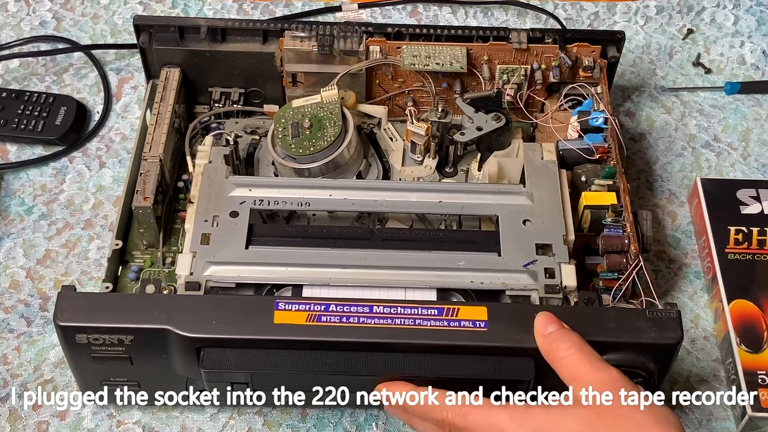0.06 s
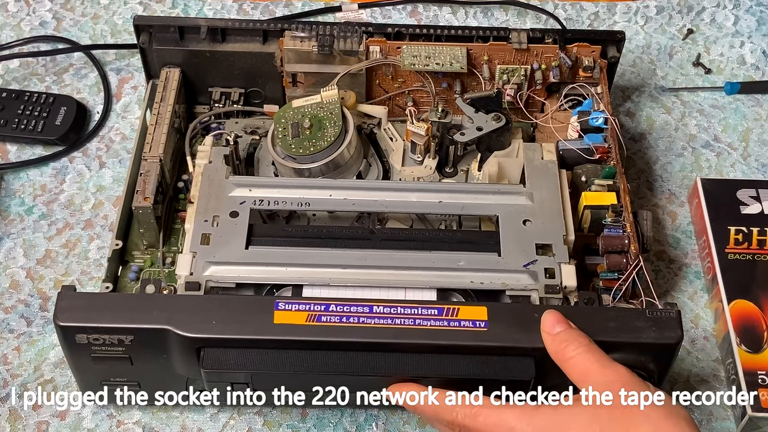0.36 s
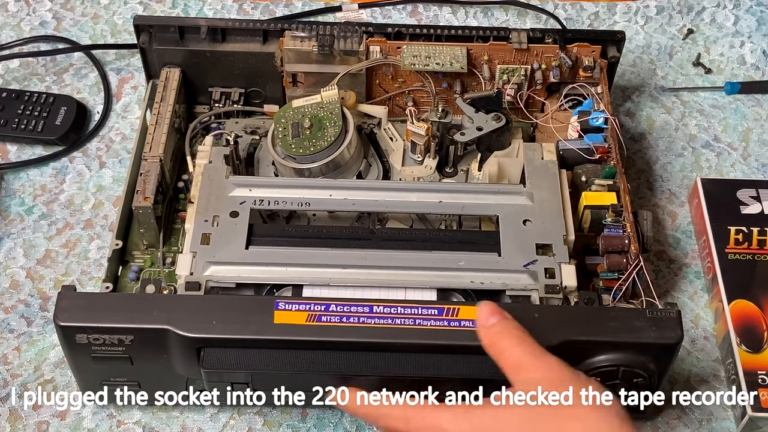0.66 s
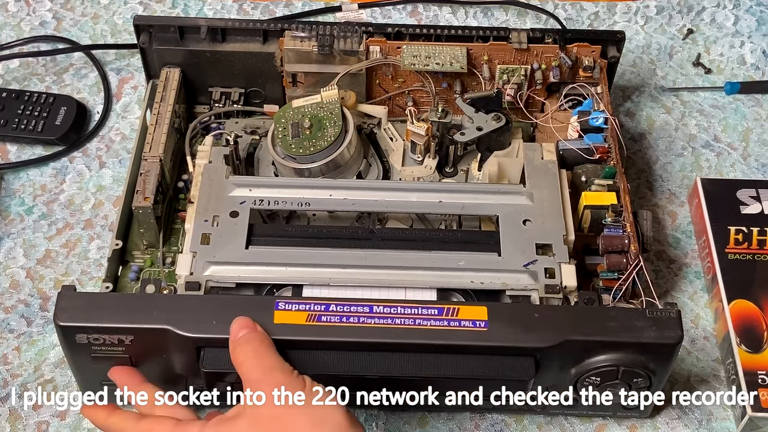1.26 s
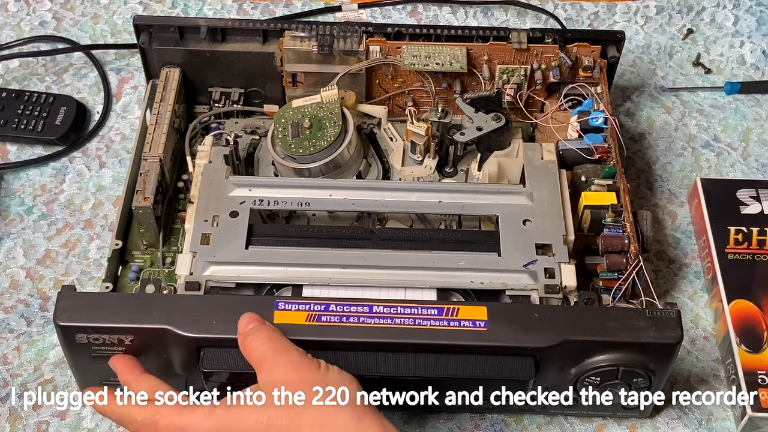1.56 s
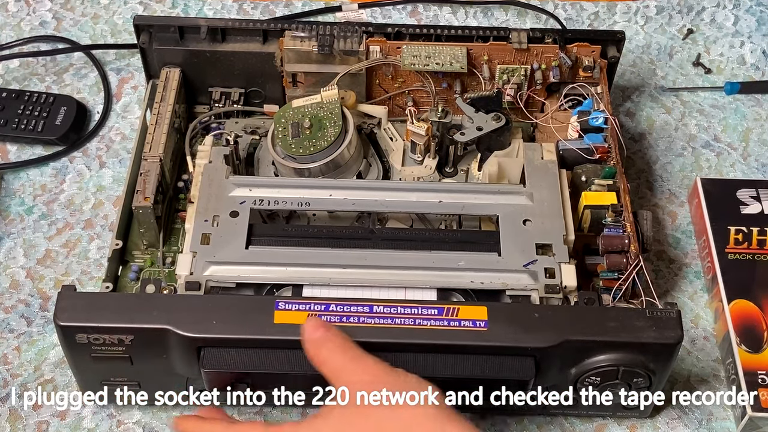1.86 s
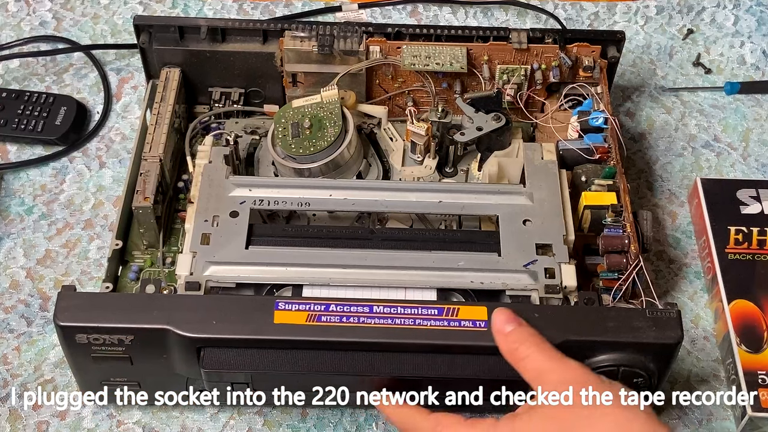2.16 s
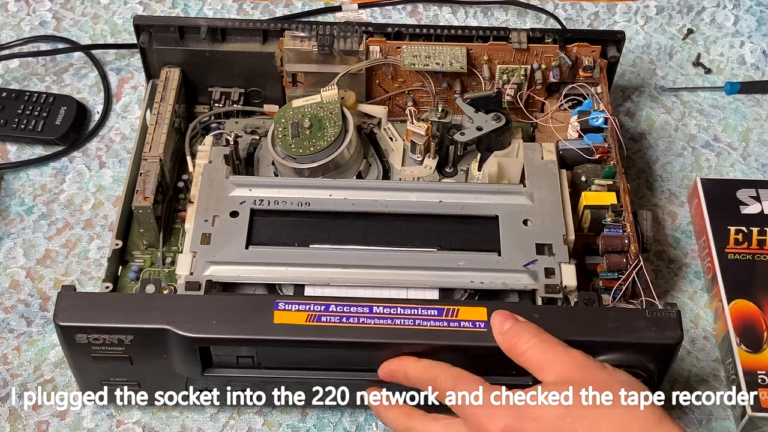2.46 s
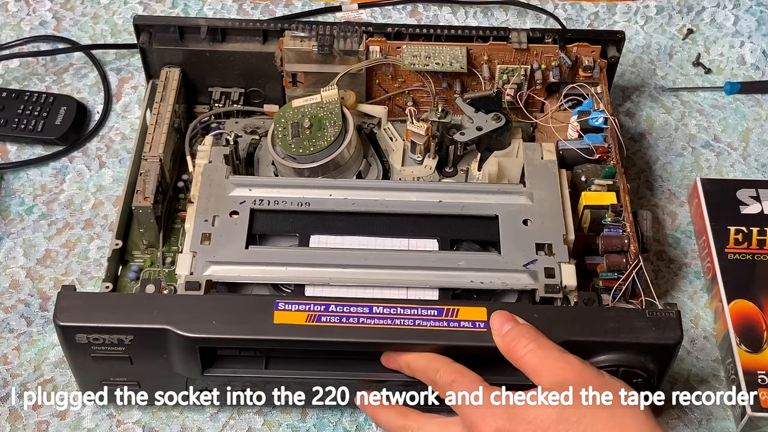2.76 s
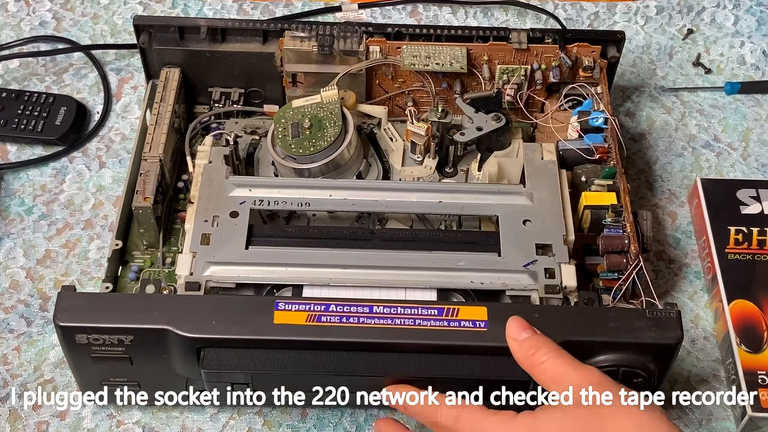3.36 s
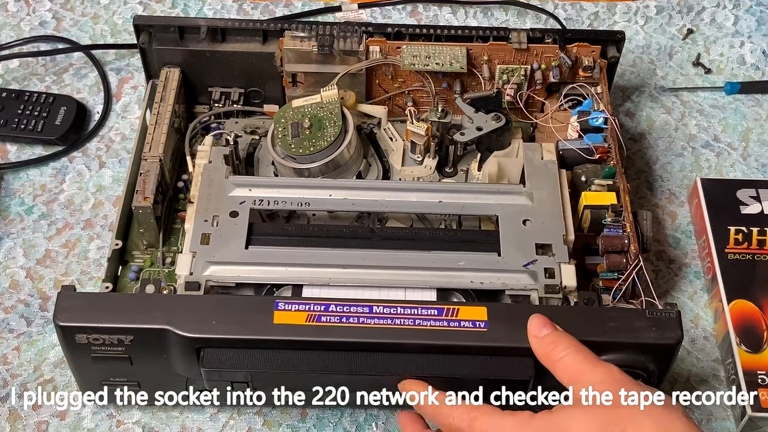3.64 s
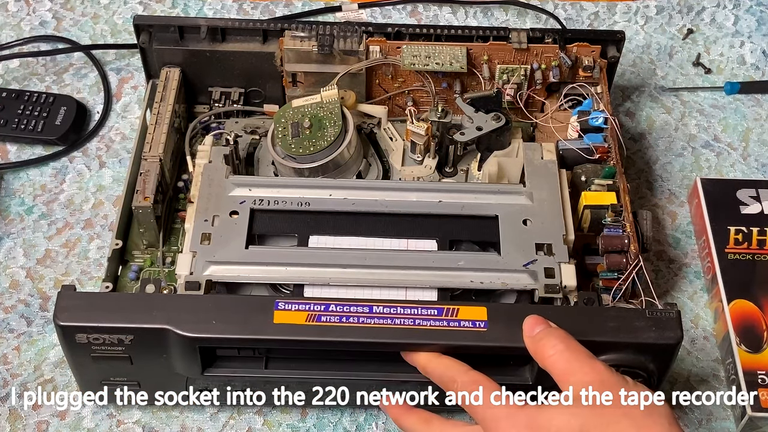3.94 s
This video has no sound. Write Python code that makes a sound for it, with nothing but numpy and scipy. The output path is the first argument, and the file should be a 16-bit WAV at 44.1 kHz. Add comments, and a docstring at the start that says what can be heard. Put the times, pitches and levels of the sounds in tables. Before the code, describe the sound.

Close to a stereo microphone in a small room, a video recorder's cassette flap knocks, followed by faint rubbing and a button click. The flap then clacks and scrapes in, out and in again, with low chassis booms and a faint closing hum.

```python
"""The cassette door of an opened video recorder, on a table in a small room, close to a stereo pair.
The door knocks once; a hand brushes over the plastic front and clicks a button. Then it pushes the
door in, lets it swing back and pushes again: the door scrapes, levers snap, the cabinet knocks and
each jolt sets the chassis booming. A faint hum lingers at the end, over the room's low rumble."""
import sys
import numpy as np
from scipy import signal
from scipy.fft import rfft, irfft
from scipy.io import wavfile

SR = 44100
rng = np.random.default_rng(int(sys.argv[2]) if len(sys.argv) > 2 else 0)


def wrap_up_sound(samples):
    """Save the sound to the file named by the first command line argument, as 16-bit audio."""
    columns = np.atleast_2d(samples).T
    # keep every value between -1 and 1, then stretch to whole-number steps
    tamed = np.clip(columns, -1, 1)
    steps = np.round(tamed * 32767).astype(np.int16)
    wavfile.write(sys.argv[1], SR, steps)


N = 176400


def from_db(db):
    """Decibels to gain."""
    return 10 ** (np.asarray(db) / 20)


def rms_one(x):
    """Scale to rms 1."""
    return x / np.sqrt(np.mean(x ** 2))


def gains(rows):
    """The dB columns of a curve as gains at every sample."""
    times, *columns = np.transpose(rows)
    return [from_db(np.interp(np.arange(N) / SR, times, db)) for db in columns]


def band(x, low, high, order=3):
    """Causal band-pass, edges in Hz."""
    return signal.sosfilt(signal.butter(order, [low, high], "band", fs=SR, output="sos"), x + 1e-18)


def colour(x, spectrum):
    """Give noise a spectrum that falls away beyond its ends; rms 1."""
    hz = np.fft.rfftfreq(N, 1 / SR) + 1
    points_hz, db = np.transpose(spectrum)
    shape = from_db(np.interp(np.log(hz), np.log(points_hz), db))
    skirts = 1 / (1 + (points_hz[0] / hz / 2) ** 4) / (1 + (hz / points_hz[-1] / 2) ** 4)
    return rms_one(irfft(rfft(x) * shape * skirts, N))


def add(out, s, x):
    """Mix x in at time s."""
    i = max(int(s * SR), 0)
    out[i:i + len(x)] += x[:N - i]


def grains(per_s, spread_db):
    """Friction: random tiny slips of uneven size."""
    slips = rng.random(N) < per_s / SR
    sizes = from_db(spread_db * np.minimum(rng.exponential(1, N), 4))
    return slips * sizes * rng.choice([-1, 1], N)


def resonate(x, pitches_hz, widths_hz, boost_db):
    """Resonances lift narrow bands and ring on; a negative boost cuts a dip."""
    return x + sum((from_db(db) - 1) * signal.lfilter(*signal.iirpeak(hz, hz / width, SR), x)
                   for hz, width, db in np.broadcast(pitches_hz, widths_hz, boost_db))


def contacts(rows, crack_s, rattle_s, rattle_db, low_hz, top_hz, body):
    """Each contact is a sharp crack and a short rattle; its highs die sooner than its lows."""
    out, t = np.zeros(N), np.arange(SR // 6) / SR
    edges_hz = [low_hz, 2000, 5000, top_hz]
    attack = 1 - np.exp(-t / .0006)
    for s, *levels in rows:
        for db, low, high in zip(levels, edges_hz, edges_hz[1:]):
            age = t * (low / 2000) ** 0.57  # the decay times hold for the middle band
            decay = np.exp(-age / crack_s) + from_db(rattle_db) * np.exp(-age / rattle_s)
            burst = band(body(rng.choice([-1, 1], len(t)) * decay * attack), low, high)
            strength = np.sqrt(np.sum(burst ** 2) / (.012 * SR))  # rms as if packed into 12 ms
            add(out, s, from_db(db) * burst / strength)
    return out


def struck(rows, modes, rise_s):
    """Blows set modes ringing; all swell in over the given rise time, then die away."""
    out, t = np.zeros(N), np.arange(SR // 2) / SR
    for s, db in rows:
        ring = sum(from_db(level + rng.normal(0, 1) - 60 * t / t60) * np.sin(2 * np.pi * hz * t)
                   for hz, level, t60 in modes)
        add(out, s, from_db(db) * ring * (1 - np.exp(-(t / rise_s) ** 2)))
    return out


# the mechanism's frame (frequency [Hz], width [Hz], boost [dB])
FRAME_RESONANCES = [(553, 120, 21), (1118, 13, 6), (1720, 45, -3.5)]
def frame(x):
    """The frame colours the scrapes and snaps that pass through it."""
    return resonate(x, *np.transpose(FRAME_RESONANCES))


# the door's travel, close up (time [s], rumble level [dB], scrape level [dB])
DOOR_TRAVEL = [(0, -45.5, -49.5), (.08, -50, -64), (.3, -77, -100), (2.29, -73, -105), (2.325, -47.5, -61),
               (2.388, -63, -40), (2.405, -41.5, -37), (2.44, -41.5, -58.5), (2.495, -43, -55.5),
               (2.508, -35.5, -40), (2.56, -34.5, -40.5), (2.58, -43.5, -56), (2.84, -69.5, -91),
               (3.085, -80.5, -105), (3.11, -58.5, -59), (3.25, -44, -50.5), (3.38, -45, -49.5),
               (3.44, -47, -62.5), (3.6, -79.5, -89.5), (3.645, -53.5, -95), (3.72, -57.5, -49.5),
               (3.79, -37.5, -43.5), (3.86, -46, -55.5), (4, -58.5, -108)]
# its two friction spectra (frequency [Hz], level [dB])
RUMBLE_SPECTRUM = [(65, 9), (180, -2), (270, 0.5), (430, -7), (560, -4.5), (750, -15)]
SCRAPE_SPECTRUM = [(500, -1), (1300, -1), (3100, 5.5), (5200, -5.5), (7200, -3), (11000, -11), (15000, -24)]
def door_swing():
    """The cassette door rumbles and scrapes in tiny slips as it swings."""
    rumble_gain, scrape_gain = gains(DOOR_TRAVEL)
    scrape = rms_one(frame(colour(grains(per_s=4000, spread_db=2.5), SCRAPE_SPECTRUM)))
    rumble = colour(grains(per_s=900, spread_db=3.5), RUMBLE_SPECTRUM)
    return band(rumble_gain * rumble + scrape_gain * scrape, 60, 18000)


# the door jolts the chassis (time [s], level [dB])
CHASSIS_JOLTS = [(0, -39.5), (0.101, -32.5), (2.327, -38), (2.509, -31.5), (2.558, -32), (3.275, -29.5),
                 (3.362, -30.5), (3.711, -40.5), (3.788, -36)]
def chassis_boom(pitch_hz=128.2, rise_s=0.011, t60_s=0.47):
    """Every jolt feeds the chassis' one low resonance, which swells, wavers and dies away."""
    swell, t = np.zeros(N), np.arange(N) / SR
    for s, db in CHASSIS_JOLTS:
        add(swell, s, from_db(db - 60 * t / t60_s) * (1 - np.exp(-(t / rise_s) ** 2)))
    waver = colour(rng.standard_normal(N), [(2, 3.5), (25, 2.5)])
    hz = pitch_hz * (1 + 0.023 * waver)
    return swell * np.sin(2 * np.pi * np.cumsum(hz) / SR)


# the small room's background (frequency [Hz], level [dB])
ROOM_TONE_SPECTRUM = [(25, -9.5), (55, 7), (125, -8.5), (200, -24), (1000, -35), (15000, -45.5)]
def room_tone(level_db=-66, side_db=-12.5):
    """A steady low rumble, nearly the same at both microphones."""
    mid, side = (colour(rng.standard_normal(N), ROOM_TONE_SPECTRUM) for _ in range(2))
    return from_db(level_db) * (mid + from_db(side_db) * side * np.array([[1], [-1]]))


def latch_body(x, range_hz=(2900, 8000), q=30):
    """Every latch is a small part with pitches of its own, mounted on the frame."""
    pitches = np.exp(rng.uniform(*np.log(range_hz), size=8))
    return frame(resonate(x, pitches, pitches / q, boost_db=6))


# latch strikes (time [s], level below 2 kHz [dB], level at 2-5 kHz [dB], level above 5 kHz [dB])
LATCH_STRIKES = [(0.087, -51, -58.5, -66.5), (2.287, -54, -75, -83), (2.3925, -39.5, -44, -50.5),
                 (2.398, -35.5, -39, -66), (2.405, -40, -42, -70), (2.4995, -44, -48, -64),
                 (2.519, -59, -50, -46), (2.533, -69, -44.5, -41.5), (2.553, -52, -40.5, -45),
                 (2.6394, -50, -51.5, -54.5), (2.763, -59, -74, -78), (3.0995, -49.5, -67.5, -81.5),
                 (3.2166, -42, -37, -40), (3.243, -44, -45.5, -63.5), (3.2745, -46.5, -54, -54),
                 (3.3505, -38, -43, -51), (3.644, -50.5, -74.5, -94), (3.9145, -55.5, -61, -76)]
def latches():
    """The door trips latches and levers, which snap and rattle."""
    return contacts(LATCH_STRIKES, crack_s=0.0049, rattle_s=0.015, rattle_db=-12,
                    low_hz=512, top_hz=10930, body=latch_body)


# knocks on the cabinet (time [s], level [dB])
CABINET_KNOCKS = [(.088, -31.5), (1.153, -56.5), (2.294, -42), (2.396, -24), (2.504, -32.5), (3.25, -37.5),
                  (3.354, -23), (3.783, -43)]
# its modes (frequency [Hz], level [dB], t60 [s])
CABINET_RING = [(537, -0.5, 0.045), (578.8, 0.5, 0.064), (620, -1, 0.077), (727, -6.5, .04)]
def cabinet_knocks():
    """The door knocks at its stops, a finger taps the case once, and the cabinet rings briefly."""
    return struck(CABINET_KNOCKS, CABINET_RING, rise_s=0.0033)


# the hand on the front panel, close up (time [s], rub level [dB], hiss level [dB])
HAND_STROKES = [(.48, -93, -109), (.655, -67.5, -63), (.73, -92, -87), (.755, -79.5, -68),
                (.85, -108, -76.5), (1.07, -79.5, -74), (1.13, -82, -91), (1.15, -64.5, -76),
                (1.222, -68.5, -75.5), (1.24, -82, -61.5), (1.29, -77, -61), (1.35, -75, -79.5),
                (1.45, -77.5, -88), (1.54, -99, -100)]
# a fingertip crosses the label (time [s], level [dB])
LABEL_SWIPE = [(.735, -100), (.752, -61), (.8, -62), (.9, -94)]
# spectra of rub, hiss and swipe (frequency [Hz], level [dB])
RUB_SPECTRUM = [(560, -6), (1300, -7.5), (2900, -4), (4200, -17)]
HISS_SPECTRUM = [(2500, -1.5), (7500, 6), (12000, -3.5), (15000, -25)]
LABEL_SPECTRUM = [(2000, -21), (2950, 0), (4200, -15)]
# resonances of the rubbed plastic (frequency [Hz])
SQUEAK_HZ = [596, 630.5, 1296]
def hand_brush():
    """Skin and sleeve brush the plastic front, which squeaks faintly."""
    rub_gain, hiss_gain = gains(HAND_STROKES)
    swipe = gains(LABEL_SWIPE)[0] * colour(rng.standard_normal(N), LABEL_SPECTRUM)
    rub = colour(rng.standard_normal(N), RUB_SPECTRUM)
    squeaky_rub = rms_one(resonate(rub, SQUEAK_HZ, widths_hz=18, boost_db=19))
    hiss = colour(grains(per_s=9000, spread_db=2.0), HISS_SPECTRUM)
    return swipe + rub_gain * squeaky_rub + hiss_gain * hiss


# fingers meet the case (time [s], level [dB])
FINGER_BUMPS = [(0.906, -77), (0.973, -65.5), (1.003, -66.5), (1.753, -49.5), (1.814, -54)]
def finger_bumps(decay_s=0.036):
    """Soft fingers make dull bumps on the case."""
    out, t = np.zeros(N), np.arange(SR // 5) / SR
    for s, db in FINGER_BUMPS:
        dull_noise = rms_one(band(rng.standard_normal(len(t)), 222, 620, order=2))
        add(out, s, from_db(db) * dull_noise * np.exp(-t / decay_s))
    return out


# resonances of the front panel (frequency [Hz])
FRONT_PANEL_HZ = [1030, 2490, 3240, 3970, 4970, 5630]
def panel(x):
    """The plastic front panel gives a click its hollow ring."""
    return resonate(x, FRONT_PANEL_HZ, widths_hz=130, boost_db=9)


# taps and clicks (time [s], level below 2 kHz [dB], level at 2-5 kHz [dB], level above 5 kHz [dB])
BUTTON_CLICKS = [(1.0415, -61, -66.5, -79), (1.146, -64, -81.5, -81), (1.6138, -39.5, -43, -38),
                 (1.742, -50.5, -45.5, -52.5), (1.7902, -47.5, -39.5, -41), (1.803, -58, -47.5, -57),
                 (1.815, -51.5, -46.5, -50), (1.826, -58.5, -46, -57.5)]
# the button's spring is struck (time [s], level [dB])
SPRING_STRIKES = [(1.6145, -28.5), (1.7425, -37.5)]
# its modes (frequency [Hz], level [dB], t60 [s])
SPRING_RING = [(1075, -6, 0.095), (1160, -10, .07), (2850, -6, .045)]
def button():
    """A finger taps the panel, the switch snaps and its spring rings."""
    snap = contacts(BUTTON_CLICKS, crack_s=0.0042, rattle_s=0.02, rattle_db=-11,
                    low_hz=950, top_hz=11900, body=panel)
    return snap + struck(SPRING_STRIKES, SPRING_RING, rise_s=0.0013)


# claps of the door's flap (time [s], level [dB])
FLAP_CLAPS = [(2.393, -38.5), (2.3983, -34.5), (2.5, -44), (3.351, -41.5)]
# its modes (frequency [Hz], level [dB], t60 [s])
FLAP_RING = [(1118, -3, .08), (1296, 0, .045), (1704, 0, .06), (2780, -4, .03), (3275, -4, .025)]
def flap_claps():
    """The flap hits its stop hard and rings brightly."""
    return struck(FLAP_CLAPS, FLAP_RING, rise_s=0.00026)


# thuds on the table (time [s], level [dB])
TABLE_THUDS = [(2.406, -31), (3.785, -34.5)]
# the case's modes (frequency [Hz], level [dB], t60 [s])
CASE_RING = [(254, 3.5, 0.063), (292, 4, 0.075)]
def case_thuds():
    """The case bumps the table and rings low."""
    return struck(TABLE_THUDS, CASE_RING, rise_s=0.0031)


# the hum rises with the last push (time [s], level [dB])
HUM_LEVEL = [(3.7, -100), (3.86, -54.5), (4, -52.5)]
# its tones (frequency [Hz], level [dB])
HUM_TONES = [(290.7, -5.5), (484.5, -1)]
def hum():
    """Two faint tones of steady pitch from the machine."""
    t = np.arange(N) / SR
    return gains(HUM_LEVEL)[0] * sum(from_db(db) * np.sin(2 * np.pi * hz * t) for hz, db in HUM_TONES)


def room_tail(x, t60_s=0.28, level_db=-8.5, side_gain=0.84):
    """The small room returns a diffuse tail, slightly different at the two microphones."""
    t = np.arange(SR // 2) / SR
    tails = rng.standard_normal((2, len(t))) * from_db(-60 * t / t60_s) * (1 - np.exp(-t / 0.002))
    mid, side = (signal.fftconvolve(x, h / np.sqrt(np.sum(h ** 2)))[:N] for h in tails)
    spread = side_gain * band(side, 400, 2000, order=1) * np.array([[1], [-1]])
    return from_db(level_db) * (band(mid, 90, 13000, order=1) + spread)


def scene():
    """Machine and hand, close and centred, with the small room around them."""
    fingers = button() + hand_brush() + finger_bumps()
    door = door_swing() + latches() + cabinet_knocks() + flap_claps() + case_thuds()
    near = door + fingers + hum()
    return near + chassis_boom() + room_tail(near) + room_tone()


# the left side's lead over the right (frequency [Hz], phase [rad])
LEFT_LEAD = [(1000, 0), (3000, .25), (7600, 0), (9200, -3.14), (10900, -6.2), (14600, -12.3)]
def record(dry, cutoff_hz=15300):
    """In the top treble the left and right sides fall out of phase; the top is cut."""
    lead = np.interp(np.fft.rfftfreq(N, 1 / SR), *np.transpose(LEFT_LEAD))
    left = irfft(rfft(dry[0]) * np.exp(1j * lead), N)
    low_pass = signal.ellip(10, .1, 80, cutoff_hz, fs=SR, output="sos")
    return signal.sosfilt(low_pass, np.array([left, dry[1]]))


dry = scene()
out = record(dry)
wrap_up_sound(out)
```